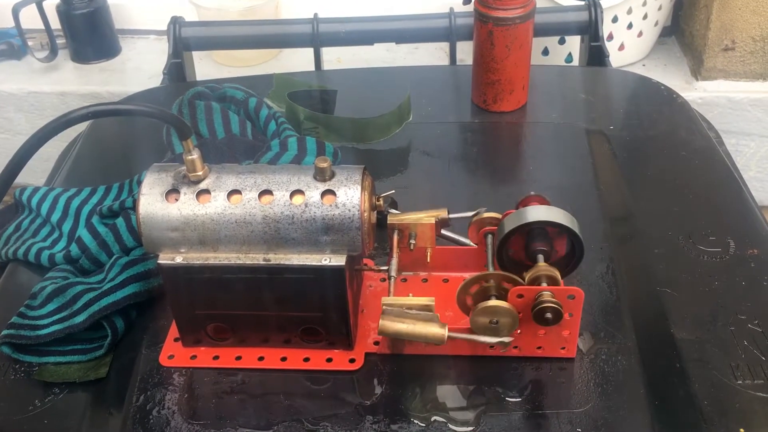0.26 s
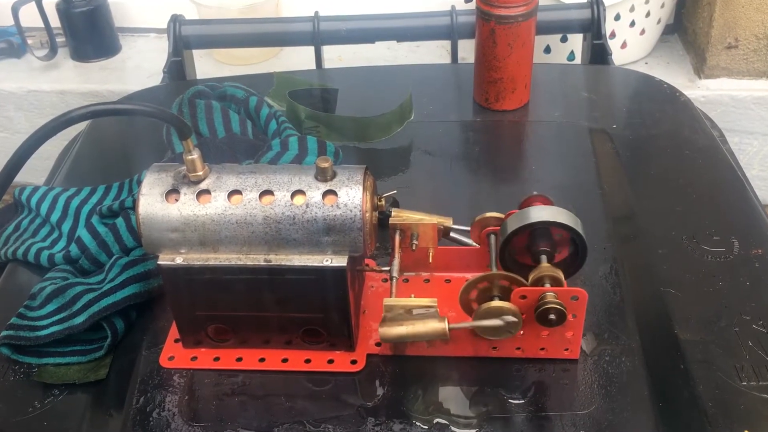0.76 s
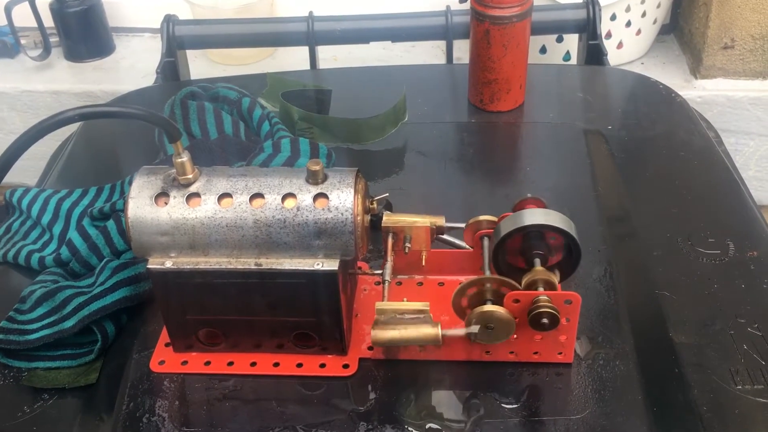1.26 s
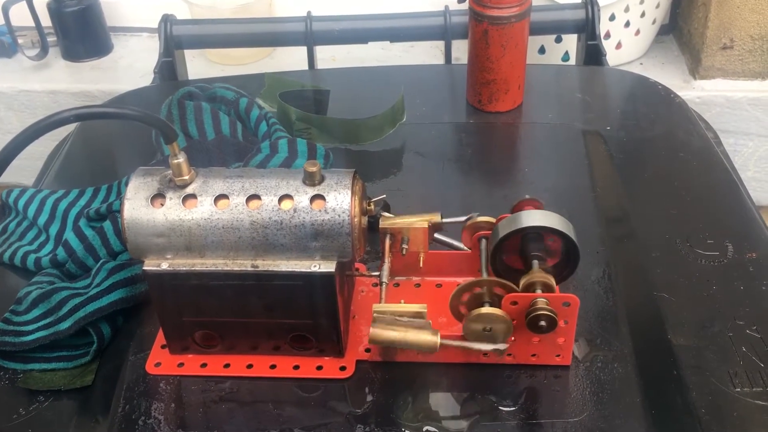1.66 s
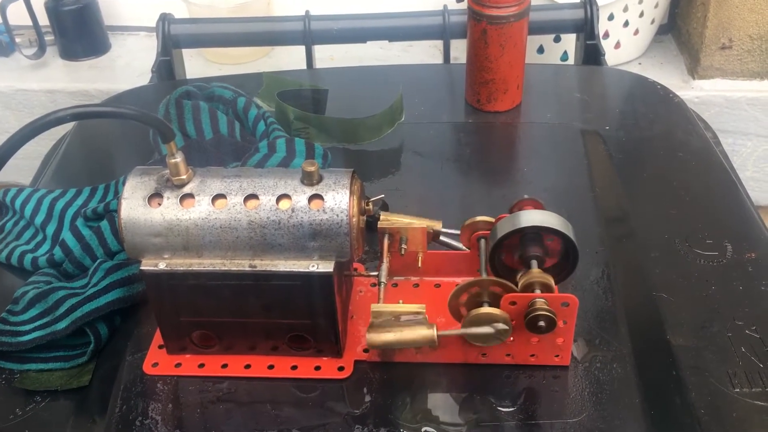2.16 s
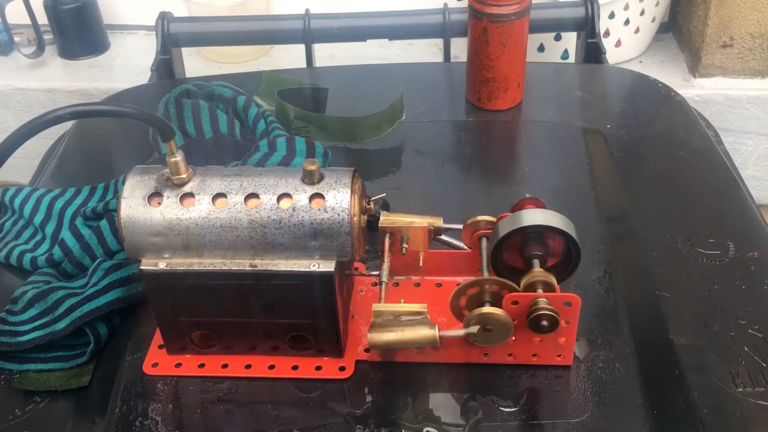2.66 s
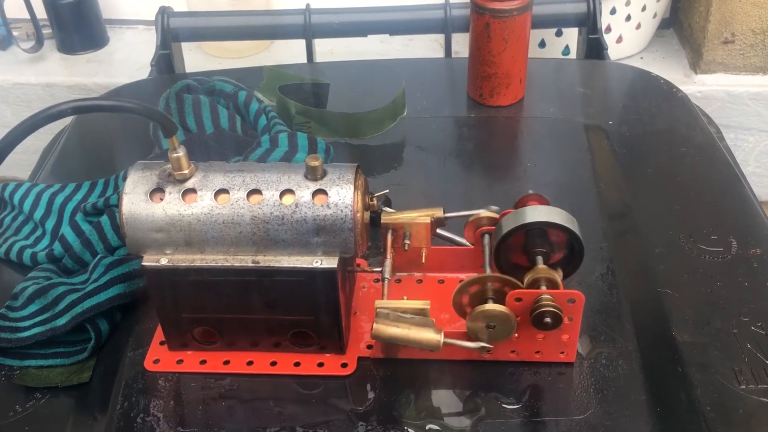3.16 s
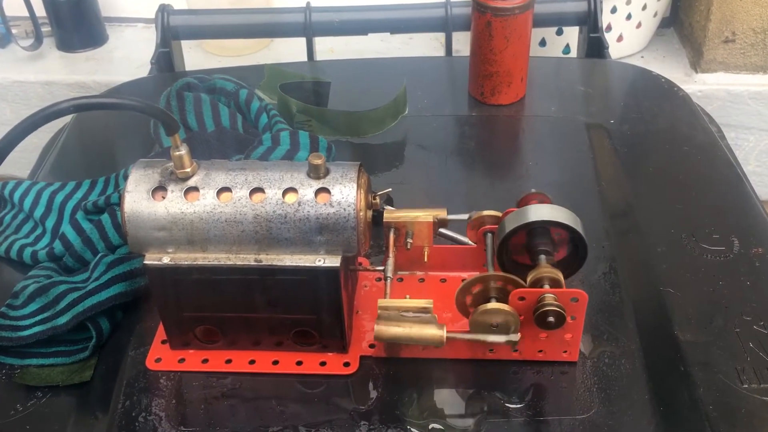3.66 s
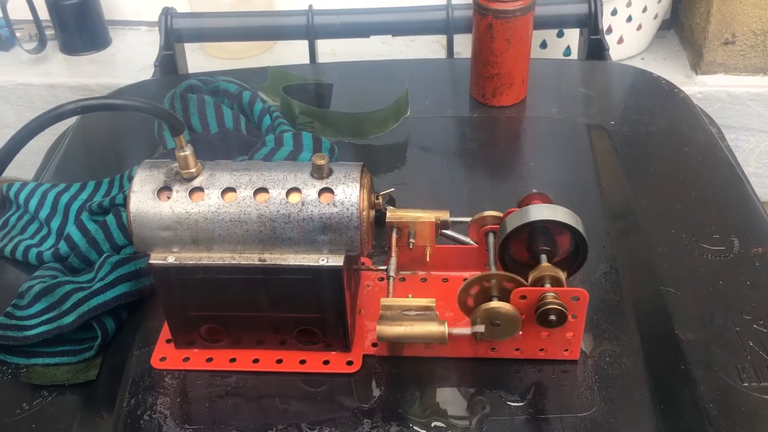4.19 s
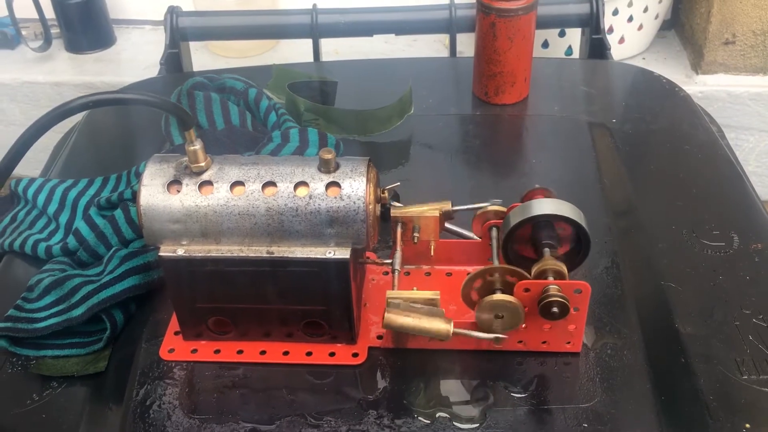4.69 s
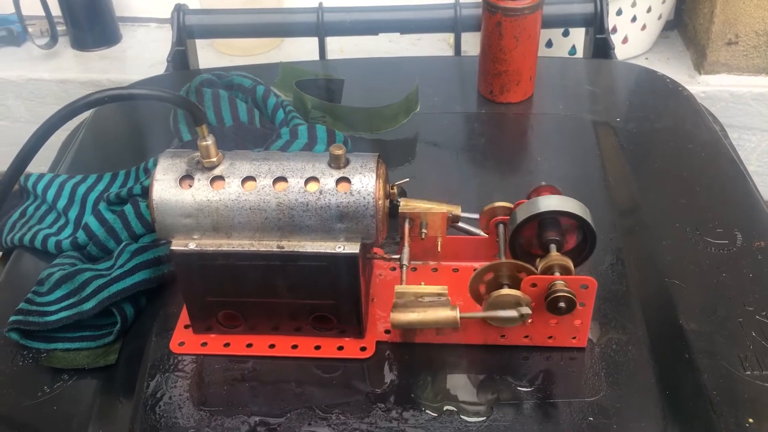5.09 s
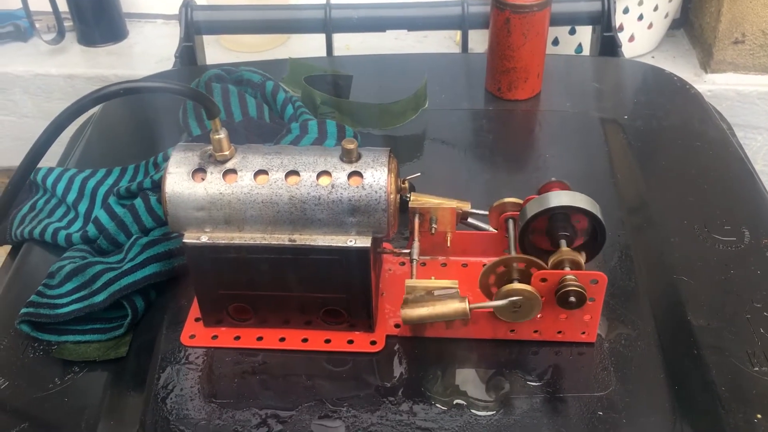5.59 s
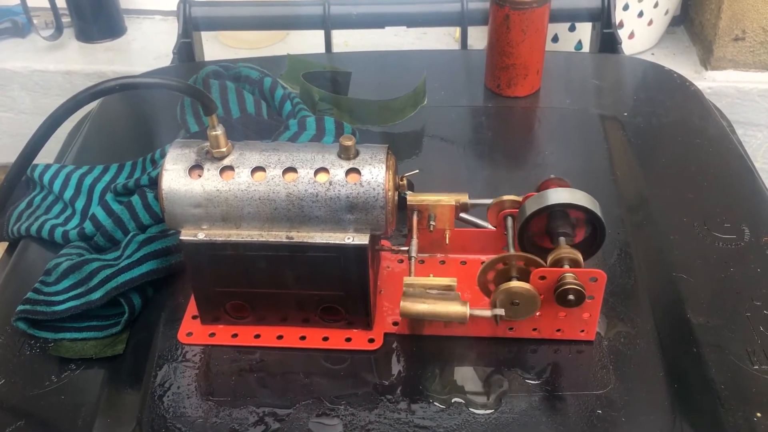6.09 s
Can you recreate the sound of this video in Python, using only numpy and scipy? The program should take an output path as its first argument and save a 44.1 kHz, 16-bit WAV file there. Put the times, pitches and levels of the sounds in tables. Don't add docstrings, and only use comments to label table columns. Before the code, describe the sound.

From 0 to about 6.4 seconds a small model steam engine runs continuously, already at speed, close to a phone microphone outdoors. It makes roughly 8.5 turns a second, each about 0.12 seconds. A turn starts with a crisp brass tick and a push into the plate, then a 3-millisecond spit of wet steam and a hard knock, with high hiss leaking away. Midway comes a second tick and low thump, then a softer double rebound. Fine rattling fills between. Dragging parts give a hollow drone near 400-500 hertz on the power stroke and a rough squeal near 950-1030 hertz on both strokes. Individual knocks vary in strength. Around 4.9 seconds the frame slips with a firmer shove; afterwards the squeal is clearly louder, the drone and plate thuds weaker. One weak shove falls near 5.96. Faint wall echoes, soft air wash and low rumble persist; it ends still running.

```python
import sys
import numpy as np
from scipy import signal
from scipy.fft import rfft, irfft, next_fast_len
from scipy.io import wavfile
from scipy.ndimage import uniform_filter1d

SR = 44100
rng = np.random.default_rng(int(sys.argv[2]) if len(sys.argv) > 2 else 0)


def nominal_scale(level):
    x = np.asarray(level, float) / 20
    return 10 ** x


def transcribe(u):
    v = np.clip(np.atleast_2d(u).T, -1, 1)
    q = np.round(v * 32767).astype(np.int16)
    wavfile.write(sys.argv[1], SR, q)


N = 279594
PAD = SR // 10


def evened(x):
    return x / np.sqrt(np.mean(x ** 2) + 1e-20)


def noise():
    return rng.standard_normal(N + PAD)


def clock():
    return (np.arange(N + PAD) - PAD) / SR


def colour(x, points):
    hz, db = np.transpose(points)
    size = next_fast_len(len(x))
    log_hz = np.log(np.fft.rfftfreq(size, 1 / SR) + 1)
    gain = nominal_scale(np.interp(log_hz, np.log(hz), db))
    return irfft(rfft(x, size) * gain, size)[:len(x)]


def mode(x, hz, width):
    r = np.exp(-np.pi * max(width, 5) / SR)
    w = 2 * np.pi * hz / SR
    return signal.lfilter([0, r * np.sin(w)], [1, -2 * r * np.cos(w), r * r], x)


def clicks(s, size):
    at = np.round(np.ravel(s) * SR).astype(int) + PAD
    return np.bincount(at, np.ravel(size), 2 * N)[:N + PAD]


CRANK_S = [-0.0295, 0.4358, 0.899, 1.3661, 1.8347, 2.3027, 2.771, 3.241, 3.7102, 4.181, 4.652, 5.128, 5.604,
           6.0765, 6.549]


def turns():
    return np.interp(np.arange(55) / 4, np.arange(len(CRANK_S)), CRANK_S)


def turn_ms():
    t, start = clock(), turns()
    turn = np.maximum(np.searchsorted(start, t) - 1, 0)
    return turn, 1000 * np.maximum(t - start[turn], 0)


# (time after port tick [ms], linkage rattle [dB], steam leak [dB], drone [dB], squeal [dB])
TURN = [(0, -34.5, -72, -56, -25), (8.6, -32, -43, -16, -7), (19, -33.5, -36, -4, -1),
        (24, -34.5, -34, -8, -2), (31.8, -27.5, -35.5, -.5, -.5), (43, -35, -42.5, .3, -9),
        (54.8, -49, -45, -11, -19), (60, -41.5, -49, -19, -12), (68, -48.5, -57, -18, -13),
        (77, -39, -52, -14.5, -5), (88, -39.5, -52, -13, .3), (101.3, -45, -49, -14, -.5),
        (109.2, -52.5, -55, -12, -14), (122, -54, -66, -17, -10)]


def round_turn(index):
    table = np.transpose(TURN)
    return nominal_scale(np.interp(turn_ms()[1], table[0], table[index]))


# (start [s], end [s])
SLIP_S = (4.9, 4.98)


def slipped(s):
    return np.interp(s, SLIP_S, [0, 1])


def strength(ms, db, scatter_db, slip_db, odd=()):
    s = turns() + ms / 1000
    level = db + scatter_db * rng.standard_normal(len(s)) + slip_db * slipped(s)
    return level + sum(change * (abs(s - at) < .04) for at, change in odd)


def contact(ms, scatter_ms, db, scatter_db, slip_db, odd=()):
    s = turns() + (ms + scatter_ms * rng.standard_normal(len(turns()))) / 1000
    return s, strength(ms, db, scatter_db, slip_db, odd)


def repeating(share):
    share = np.clip(share, 0, 1)
    worn = rng.standard_normal(SR)[(turn_ms()[1] * SR / 1000).astype(int)]
    return np.sqrt(share) * worn + np.sqrt(1 - share) * noise()


# (frequency [Hz], level [dB])
AIR = [(30, -19), (70, 7.5), (100, -5), (300, -0.5), (1000, -1.5), (2500, -14), (6000, -25), (16000, -44)]
AIR_DB = -39.5


def air():
    lumps = evened(uniform_filter1d(noise(), size=6000))
    low = mode(noise(), 48, 20) + mode(noise(), 69, 20)
    rumble = nominal_scale(-46.3 + 0.51 * lumps) * evened(mode(low, 64, 50))
    return nominal_scale(AIR_DB) * evened(colour(noise(), AIR)) + rumble


# (frequency [Hz], width [Hz], level [dB])
BRASS = [(1532, 160, -10.5), (1790, 166, -5), (2065, 130, -3), (2340, 110, -8), (2652, 42, -13),
         (2893, 46, -14.5), (3140, 42, -11), (3470, 150, -7.5), (4000, 340, -7.5), (4480, 140, -8),
         (5252, 122, -7.5), (5536, 220, -8), (6760, 1140, -8), (8210, 410, -12), (9620, 420, -9.5),
         (11200, 1200, -8.5), (14300, 1200, -1)]
SEATED_DB, SLIPPED_DB = .7, -2.3


def brass(x, direct_db):
    seat = nominal_scale(SEATED_DB + (SLIPPED_DB - SEATED_DB) * slipped(clock()))
    rings = nominal_scale(direct_db) * x
    for k, (hz, width, db) in enumerate(BRASS):
        drive = x * seat if hz < 2500 else x
        gain = (-1) ** k * nominal_scale(db + 11) * np.sqrt(4 * np.pi * width / SR)
        rings = rings + gain * mode(drive, hz, width)
    return rings


def blows(s, db, points, chatter_ms, tail_db, tail_ms):
    ms = 1000 * np.arange(2000) / SR
    shape = np.exp(-ms / chatter_ms) + nominal_scale(tail_db) * np.exp(-ms / tail_ms)
    force = signal.oaconvolve(clicks(s, nominal_scale(db)), shape)[:N + PAD] * noise()
    return colour(force, points)


# (frequency [Hz], level [dB])
TICK = [(1000, -53), (2000, -18), (4500, -17), (5700, -13), (6700, 1), (7600, -6.5), (11000, -20),
        (15500, -21)]
KNOCK = [(1000, -13), (2000, -8.5), (3500, -9.5), (5250, -6.5), (6700, -6.5), (9500, -8), (11000, -10),
         (15500, -43.5)]
# (time after port opens [ms], scatter [ms], level [dB], scatter [dB], change after slip [dB])
PORT_TICK = (.4, .4, -29.5, 2.2, -.6)
BIG_END = (18.9, .6, -26.5, 1.2, 1.2)
CRANK_PIN = (57.4, .7, -28.3, 1.4, -.4)
RETURN = (76.1, 1.1, -33, 2.2, -1.2)
WET_S = [-0.03, 1.017, 1.249, 1.483, 2.069, 2.303, 2.654, 3.006, 4.77, 5.128, 5.247, 5.366, 5.604, 5.958]
WET_DB = -12.5
# (time [s], change [dB])
ODD_KNOCKS = [(.105, -2.5), (.338, -4), (.454, 4.5), (.802, 2.5), (1.269, 2.4), (1.386, -4), (2.089, 3),
              (2.321, 0), (2.555, 3.5), (2.79, 2.4), (2.908, 4), (3.259, -4.5), (3.377, 2.6), (3.73, 2.4),
              (4.201, 3.4), (4.435, 3), (4.671, 3.4), (4.91, 4), (5.028, 2.6), (5.386, -4), (5.505, 3),
              (6.096, 2.2)]
ODD_PINS = [(.143, -3.6), (.259, 6), (1.19, 4.6), (1.306, 3.2), (1.776, -3.6), (2.126, 4.2), (2.244, -6.5),
            (2.477, 3.2), (2.71, 4.2), (2.828, 3.2), (3.535, 3.8), (4.355, 5), (4.473, -5), (4.596, -4.6),
            (4.829, -12), (5.187, -7), (5.78, 6), (6.017, -3.4)]


def linkage():
    port, port_db = contact(*PORT_TICK, [(s, WET_DB) for s in WET_S])
    pin, pin_db = contact(*CRANK_PIN, ODD_PINS)
    knock, knock_db = contact(*BIG_END, ODD_KNOCKS)
    back, back_db = contact(*RETURN)
    rebound = back + (11 + 0.52 * rng.standard_normal(len(back))) / 1000

    light_db = np.r_[port_db, pin_db] - 0.5
    ticks = blows(np.r_[port, pin - .0007], light_db, TICK, 1.0, -10.5, 6.4)
    heavy_db = np.r_[knock_db - 1.5, back_db - 1.5, back_db - 5]
    ticks += blows(np.r_[knock, back, rebound], heavy_db, TICK, 1.0, -7, 7.9)
    all_db = np.r_[knock_db, back_db, port_db - 6, pin_db - 8.5] - 0.5
    knocks = blows(np.r_[knock, back, port, pin + .0035], all_db, KNOCK, 0.71, -13, 10.2)

    clumps = evened(uniform_filter1d(noise(), size=130))
    grains = nominal_scale(1.3 * rng.exponential(1, N + PAD) + 3.0 * clumps) * noise()
    rattle = evened(brass(colour(grains, KNOCK), 1.5))
    return brass(ticks + knocks, -3.5) + round_turn(index=1) * nominal_scale(-1) * rattle


# (time after port tick [ms], level re stroke [dB], centre [Hz])
PUSHES = [(.5, -1, 270), (6.08, -6, 1290), (6.5, -5.5, 390), (9, -7, 160), (12, -7, 520), (20.52, 1, 760),
          (21.22, -4, 1150), (20, -6, 400), (30, -5, 1150), (34, -3.5, 118), (30, -8, 260),
          (53.5, 4.5, 290), (51, 7.5, 160), (58, -3, 560), (74.5, 4, 255), (77.3, 1, 800), (80, -4, 420)]
# (width [Hz], level [dB])
PLATE_HZ = [126, 142, 162, 188, 264, 300, 375, 425, 496, 655, 733, 850, 940, 1035, 1120, 1227, 1316]
PLATE = [(24, 5), (20, -2), (17, -3.5), (24, -8), (25.9, -3.5), (34.8, -12.5), (30, -.5), (27.9, 0),
         (24, -.5), (50, -.8), (30, .5), (35, -8.5), (36, -6), (45.2, -1.5), (60, -0.5), (42, 1.5),
         (38, -4)]
# (time after port opens [ms], level [dB], scatter [dB], change after slip [dB])
SHOVE = (3, -30, 1.3, -3.3)
THUMP = (57, -36.5, 1.6, -1.5)
# (time [s], change [dB])
ODD_SHOVES = [
    (-.03, -12),
    (4.89, 4.5),
    (5.247, 3.5),
    (5.958, -10),
    (6.076, 3),
]


def plate(shake):
    port = turns()[:, None]
    ms, db, push_hz = np.transpose(PUSHES)
    shove_db = strength(*SHOVE, ODD_SHOVES)[:, None]
    stroke_db = np.where(ms < 50, shove_db, strength(*THUMP)[:, None])
    late, size = rng.standard_normal((len(port), len(ms), 2)).transpose(2, 0, 1)
    s = port + (ms + 0.17 * late) / 1000
    force = nominal_scale(stroke_db + db + 0.5 + 0.47 * size)
    out = 0
    for hz, (width, mode_db) in zip(PLATE_HZ, PLATE):
        reach = np.exp(-(np.log(hz / push_hz) / .19) ** 2)
        soft = signal.windows.hann(int(1.3 * SR / hz))
        pulse = 4 * np.gradient(soft) * SR / (2 * np.pi * hz * soft.sum())
        pushes = signal.oaconvolve(clicks(s, force * reach), pulse)[:N + PAD]
        out = out + nominal_scale(mode_db) * mode(pushes + np.sqrt(width / SR) * shake, hz, width)
    return signal.sosfilt(signal.cheby2(6, 40, 92, "high", fs=SR, output="sos"), out)


# (frequency [Hz], level [dB])
JET = [(3000, -28), (7000, -16), (9500, -10), (10700, -12), (12800, -9.5), (14400, 2), (15300, -7),
       (16200, -7.5)]
LEAK = [(3000, -4), (6000, -7.5), (9500, -3), (10700, -9.5), (12500, -4), (14500, -5.5), (16200, -6.5)]
# (time after port opens [ms], scatter [ms], level [dB], scatter [dB], change after slip [dB])
SPIT = (14.1, .9, -27.4, 1.3, -.3)


def steam():
    s, db = contact(*SPIT)
    ms = 1000 * np.arange(-400, 400) / SR
    puff = np.exp(-abs(ms / np.where(ms < 0, 2.7, 2.6)) ** 2)
    spit = signal.oaconvolve(clicks(s, nominal_scale(db + 5)), puff, "same")
    droplets = nominal_scale(1.2 * rng.exponential(1, N + PAD)) * noise()
    leak = evened(colour(noise(), LEAK))
    return spit * evened(colour(droplets, JET)) + nominal_scale(3.0) * round_turn(index=2) * leak


def slipping(drag, hz, width, steady):
    ring = drag
    for _ in range(3):
        ring = mode(ring, hz, 1.23 * width)
    ring = evened(ring)
    height = np.sqrt(abs(uniform_filter1d(ring ** 2, size=150)) + .05)
    return evened(ring / height ** steady)


# (time after port opens [ms], level [dB], scatter [dB], change after slip [dB])
DRONE = (19, -33.4, 1.3, -3.8)
POWER_SQUEAL = (19, -37, 1.8, 6.8)
RETURN_SQUEAL = (76, -34.6, 1.3, 7.6)


def rubbing():
    turn, ms = turn_ms()
    drag = repeating(0.29)
    slid = slipped(turns()[turn])
    squeal_db = np.where(ms < 64, strength(*POWER_SQUEAL)[turn], strength(*RETURN_SQUEAL)[turn])
    drone_db = strength(*DRONE)[turn]
    squeal_db, drone_db = uniform_filter1d([squeal_db, drone_db], size=300, axis=1)

    drone = slipping(drag, 496, 40, .7) - .15 * slipping(drag, 463, 35, .5)
    drone += (.7 - .4 * slid) * slipping(drag, 426, 40, .5) + .22 * slipping(drag, 376, 45, .4)
    squeal = slipping(drag, 942, 48, .85) + .55 * slipping(drag, 1030, 65, .6)
    squeal += (.15 + .2 * slid) * slipping(drag, 1220, 90, .3)
    return nominal_scale(drone_db) * round_turn(index=3) * drone + nominal_scale(squeal_db) * round_turn(index=4) * squeal


def yard(x):
    at = np.arange(60, SR // 4, 22)
    taps = np.zeros(SR // 4 + 22)
    fade = nominal_scale(-60 * at / SR / 0.27)
    taps[at + rng.integers(0, 22, len(at))] = rng.choice([-1., 1.], len(at)) * fade
    return signal.oaconvolve(x, taps / np.linalg.norm(taps))[:len(x)]


def scene():
    shake = nominal_scale(0.5) * round_turn(index=1) * repeating(0.2)
    engine = linkage() + plate(shake) + steam() + rubbing()
    return (engine + nominal_scale(-13) * yard(engine) + air())[None, PAD:]


def low_pass(x):
    return signal.sosfilt(signal.butter(12, 16460, fs=SR, output="sos"), x)


def record(dry):
    dry = signal.sosfilt(signal.butter(3, 42, "high", fs=SR, output="sos"), dry)
    band_limit = signal.firwin(301, 15950, window=("kaiser", 9), fs=SR)
    dry = signal.oaconvolve(dry, band_limit[None], "same")
    return low_pass(dry)


dry = scene()
out = record(dry)
transcribe(out)
```